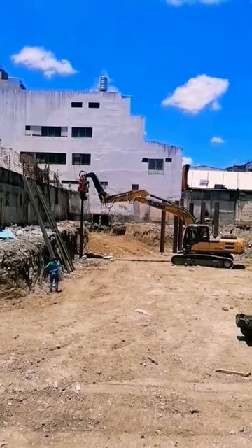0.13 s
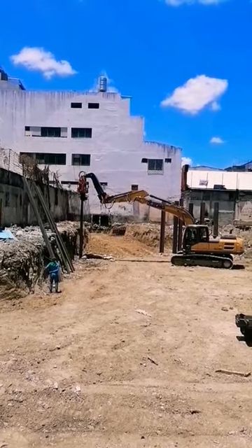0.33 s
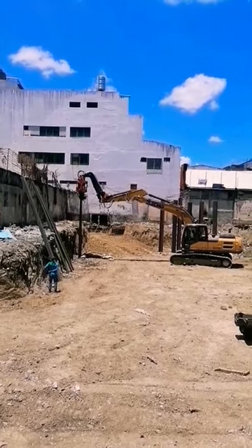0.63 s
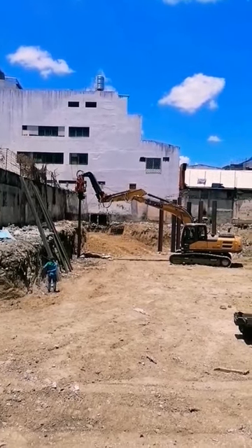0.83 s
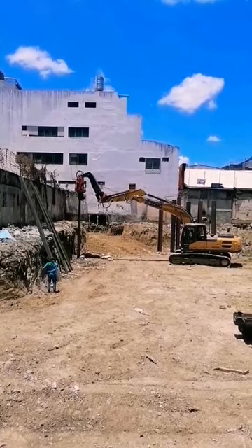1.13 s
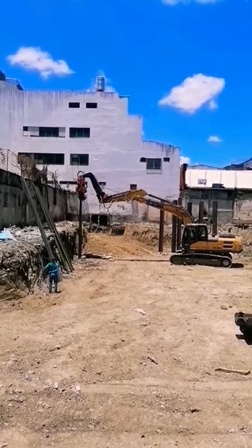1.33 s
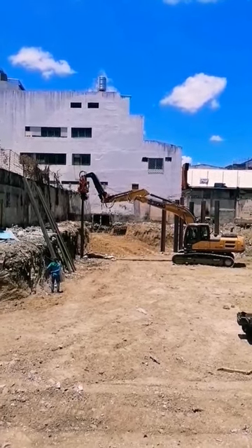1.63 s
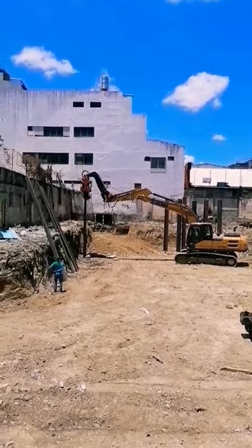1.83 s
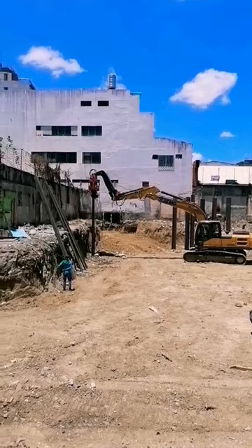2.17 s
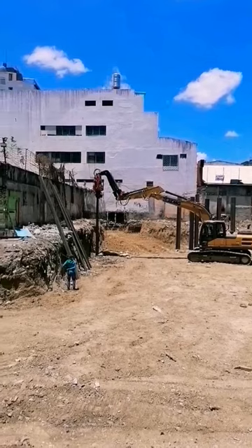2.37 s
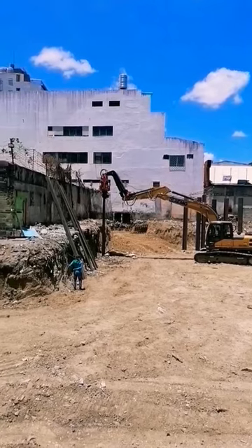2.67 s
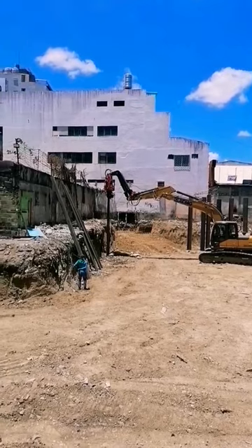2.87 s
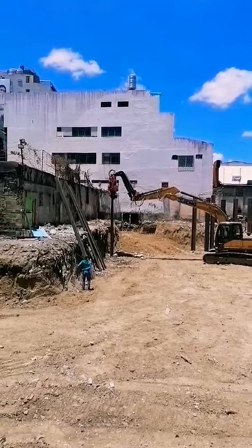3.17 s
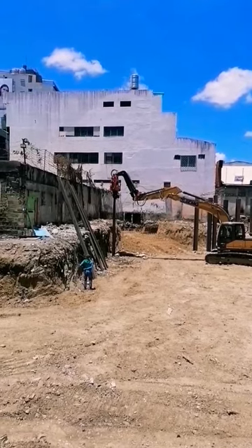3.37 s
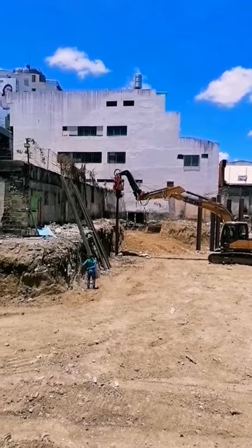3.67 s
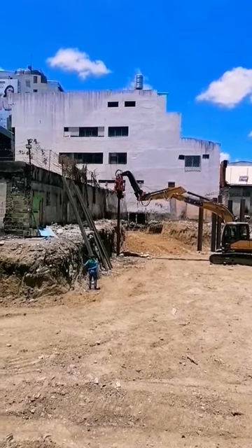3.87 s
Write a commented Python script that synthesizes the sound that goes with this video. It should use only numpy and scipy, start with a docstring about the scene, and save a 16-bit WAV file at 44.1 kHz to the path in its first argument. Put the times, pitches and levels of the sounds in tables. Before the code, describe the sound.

A vibratory pile driver on an excavator: diesel drone and pump whine run steadily, then clanks and a brief ground thrum lead into loud, uneven steel hammering, heard from across a reverberant walled pit.

```python
"""A pump whines over the drone of an excavator's diesel, at a nearly steady speed, in a walled pit.
The vibratory driver on its arm starts: the clamp clanks on a steel sheet pile, the ground thrums briefly,
then the pile hammers and rattles loudly. Drone and whine are harmonics of one engine phase; engine noise,
rattle and blows are shaped noise; squeaks and thrum are jittered sines. The walls smear every blow."""
import sys
import numpy as np
from scipy import signal
from scipy.fft import rfft, irfft, next_fast_len
from scipy.io import wavfile
from scipy.ndimage import map_coordinates

SR = 44100
rng = np.random.default_rng(int(sys.argv[2]) if len(sys.argv) > 2 else 0)


def int16_out(signal):
    """Quantize to a 16-bit WAV file."""
    q = np.round(np.clip(np.atleast_2d(signal).T, -1, 1) * 32767)
    wavfile.write(sys.argv[1], SR, q.astype(np.int16))


N = 176400


def amp(db):
    """Decibels to gain."""
    return 10 ** (np.asarray(db) / 20)


def unit(x):
    """Scale to rms 1."""
    return x / np.sqrt(np.mean(x ** 2) + 1e-20)


def along(points, hz):
    """Interpolate (f/Hz, value) points on a log frequency axis."""
    f, v = np.transpose(points)
    return np.interp(np.log(hz + 1), np.log(f + 1), v)


def curve(rows):
    """Interpolate (t/s, value) points, one value per sample."""
    return np.interp(np.arange(N) / SR, *np.transpose(rows))


def wobble(rate_hz):
    """Smooth random curve through rate_hz normal knots a second."""
    knots = rng.standard_normal(int(N * rate_hz / SR) + 4)
    return map_coordinates(knots, [np.arange(N) * rate_hz / SR])


def filtered(x, response):
    """Multiply the spectrum of x by a complex response of frequency."""
    m = next_fast_len(N + SR)
    return irfft(rfft(x, m) * response(np.fft.rfftfreq(m, 1 / SR)), m)[..., :N]


def colour(x, spectrum):
    """Causal minimum-phase filter of (f/Hz, level/dB) shape that keeps the power of white noise."""
    m = 2 * next_fast_len(N)
    gain = unit(amp(along(spectrum, np.fft.rfftfreq(m, 1 / SR))))
    cepstrum = irfft(np.log(gain + 1e-6))
    # fold the cepstrum onto positive time
    cepstrum[1:m // 2] *= 2
    cepstrum[m // 2 + 1:] = 0
    return irfft(rfft(x, m) * np.exp(rfft(cepstrum)))[..., :N]


def spread(pair, alike, side_db):
    """Two unrelated signals to left and right, with a likeness and a balance for each frequency."""
    def mid_side_gains(hz):
        turn = np.arccos(np.clip(along(alike, hz), -1, 1)) / 2
        return np.array([np.cos(turn), np.sin(turn)])

    mid, side = filtered(pair, mid_side_gains)
    left_right = np.array([mid + side, mid - side])
    return filtered(left_right, lambda hz: amp(np.outer([.5, -.5], along(side_db, hz))))


def grains(rough_db):
    """Two noises, joint rms 1, clumped into tiny contacts by one shared random level."""
    return unit(rng.standard_normal((2, N)) * amp(rough_db * wobble(900)))


def strike(start_s, attack_s, hold_s, t60_s):
    """Envelope of one contact: exponential rise, hold, exponential decay."""
    t = np.maximum(np.arange(N) / SR - start_s, 0)
    decay = np.exp(-np.log(1000) * np.maximum(t - hold_s, 0) / t60_s)
    return (1 - np.exp(-t / attack_s)) * decay


def sing(hz, waver_hz):
    """A rough tone, near rms 1, whose pitch jitters quickly."""
    phase = 2 * np.pi * np.cumsum(hz + waver_hz * wobble(220)) / SR
    return np.sqrt(2) * np.sin(phase) * amp(1.5 * wobble(70))


def resonance(f, centre, width):
    """Complex response of one damped mode, 1 at its centre."""
    return 1j * f * width / (centre * centre - f * f + 1j * f * width)


def resonate(x, table):
    """Ring (f/Hz, width/Hz, level/dB) modes, dark above the last, keeping the power of white noise."""
    def response(f):
        # alternate signs between successive modes
        modes = sum((-1) ** k * amp(db) * resonance(f, hz, width) for k, (hz, width, db) in enumerate(table))
        modes = modes / (1 + .5j * f / table[-1][0]) ** 2
        return modes / np.sqrt(np.mean(abs(modes) ** 2))

    return filtered(x, response)


# bending modes of the pile, relative to its broad response [f/Hz, level/dB]
BENDING = [(195, 6), (251, 4), (424, 2), (566, 4), (955, 4), (1064, 6), (1146, 6), (1482, 4)]
BENDING_WIDTH_HZ = 10


def bend(x):
    """Lift the pile's bending modes out of its broad response."""
    return filtered(x, lambda f: 1 + sum(
        (amp(db) - 1) * resonance(f, hz, BENDING_WIDTH_HZ) for hz, db in BENDING))


# reverberation time of the pit [f/Hz, t60/s]
WALLS = [(200, 0.72), (2000, 0.72), (10000, 0.48)]


def walls(x, wet_db):
    """Add the pit's reverberation: a noise tail, each frequency dying at its own speed."""
    hz, t, z = signal.stft(rng.standard_normal((2, SR // 2)), SR, nperseg=256)
    decay = np.exp(-np.log(1000) * t / along(WALLS, hz)[:, None])
    tail = signal.istft(z * decay, SR, nperseg=256)[1]
    tail = tail / np.linalg.norm(tail[0])
    return x + amp(wet_db) * signal.fftconvolve(x, tail, axes=1)[:, :N]


REPEAT_SHARE = .4  # of the power


def valve_train(phase, firing_hz):
    """Clatter noise of which a share repeats with every second firing."""
    pattern = rng.standard_normal((2, round(2 * SR / firing_hz)))
    place = (phase / (4 * np.pi) % 1 * pattern.shape[1]).astype(int)
    repeated = np.sqrt(REPEAT_SHARE) * pattern[:, place]
    return repeated + np.sqrt(1 - REPEAT_SHARE) * grains(rough_db=1.5)


# engine speed [t/s, firing rate/Hz]
SPEED = [(0, 64.6), (.4, 67), (.8, 66.4), (1.3, 67.05), (2.1, 67.15), (2.4, 65.6), (2.65, 66.2), (4, 66.2)]
# exhaust drone [t/s, level/dB]
DRONE = [(0, -36), (1.2, -38), (2.25, -43.5), (2.38, -34.5), (2.7, -38.5), (4, -38.5)]
# exhaust orders [multiple of firing rate, level/dB]
ORDERS = [(1, 0), (2, -13), (3, -7)]
# pump whine [t/s, level/dB]
WHINE = [(0, -50.5), (.4, -40.5), (.8, -41.5), (1.1, -38.5), (1.6, -38), (2.05, -40.5), (2.35, -50),
         (2.7, -42), (4, -33)]
# pump overtones [multiple of piston rate, level/dB]
PUMP = [(1, -2.5), (2, -22)]
PISTONS = 9  # piston rate / firing rate
# mechanical clatter [t/s, level/dB]
ENGINE_LEVEL = [(0, -42), (.3, -41), (1, -41.5), (1.6, -41), (2.1, -41.5), (4, -46)]
# clatter spectrum, relative [f/Hz, level/dB per Hz]
ENGINE_BODY = [(250, -40.5), (473, -11), (620, -10), (799, -19.5), (1260, -17.5), (1500, -23), (1630, -18),
               (1900, -25.5), (2240, -24.5), (3200, -30.5), (3950, -32.5), (4250, -37.5), (4960, -35),
               (5550, -36), (6300, -42), (9500, -46), (15000, -64)]
# low rumble spectrum, relative [f/Hz, level/dB per Hz]
RUMBLE = [(30, -11), (45, 2), (80, 0), (190, 1.5), (330, -8.5), (385, -4.5), (430, -11.5), (700, -13),
          (2000, -84)]
RUMBLE_DB = -37
# engine noise, stereo likeness [f/Hz, left-right correlation]
ENGINE_ALIKE = [(60, 0.77), (200, 1), (1000, 0.73), (5000, 0.24)]
# engine noise, stereo balance [f/Hz, left minus right/dB]
ENGINE_SIDE = [(200, -1), (370, 3), (690, -2.5), (2300, -1.5), (8000, -1)]


def engine():
    """Diesel drone, pump whine and clatter follow one engine phase, over a steady rumble."""
    phase = 2 * np.pi * np.cumsum(curve(SPEED)) / SR

    def line(order, waver):
        sway = 1 + waver * (wobble(12) + 1j * wobble(13))
        return np.sqrt(2) * np.real(sway * np.exp(1j * (order * phase + 2 * np.pi * rng.random())))

    drone = amp(curve(DRONE)) * sum(amp(db) * line(k, waver=0.15) for k, db in ORDERS)
    whine = amp(curve(WHINE)) * sum(amp(db) * line(PISTONS * round(k), waver=0.23) for k, db in PUMP)
    firing_pulse = 1 + 0.059 * np.cos(phase)
    clatter = valve_train(phase, SPEED[-1][1]) * firing_pulse
    clatter = colour(clatter, [(150, -20.5)] + list(ENGINE_BODY))
    clatter = amp(curve(ENGINE_LEVEL) + 0.76 * wobble(10.97)) * clatter
    rumble = amp(RUMBLE_DB) * colour(rng.standard_normal((2, N)), RUMBLE)
    rightward = np.array([[-1], [1]])
    tones = drone * amp(rightward * 1.6) + whine * amp(rightward * 3.2)
    return tones + spread(clatter + rumble, ENGINE_ALIKE, ENGINE_SIDE)


# thin machine squeaks [t/s, hold/s, f/Hz, level/dB]
SQUEAKS = [(.35, .1, 3980, -62), (.61, .07, 3990, -62), (2.98, .08, 4130, -45), (3.168, .012, 6080, -40),
           (3.31, .15, 4110, -44), (3.642, .014, 6060, -45)]


def squeaks():
    """Thin steel squeaks as jittered tones, faint at first and stronger once the pile shakes."""
    return sum(amp(db) * strike(s, .008, hold, .08) * sing(hz, 50) for s, hold, hz, db in SQUEAKS)


# resonances of frame, pile, ground [t/s, hold/s, f/Hz, waver/Hz, level/dB]
SPIN_UP = [(2.6, .4, 920, 32, -42), (2.835, .06, 620, 12, -28.5), (2.94, .1, 65.5, 3, -28.5)]


def spin_up():
    """As it spins up, the driver sets off one resonance after another, each a wavering tone."""
    return sum(amp(db) * strike(s, .02, hold, .08) * sing(hz, waver) for s, hold, hz, waver, db in SPIN_UP)


# first clanks of the clamp [t/s, level/dB]
CLANKS = [(2.597, -39.5), (2.766, -36), (2.802, -39), (2.848, -29), (2.928, -32), (2.97, -27),
          (2.995, -25.5), (3.034, -27.5)]
# dull knocks of the pile [t/s, level/dB]
KNOCKS = [(2.537, -28.5), (2.6, -31.5), (2.801, -28), (2.854, -25.5), (2.934, -26.5)]
# jaws rubbing on the pile [t/s, level/dB]
SQUEAL = [(2.585, -80), (2.61, -47), (2.755, -49), (2.78, -43), (2.96, -37), (3, -31), (3.08, -34),
          (4, -41)]
# steel modes of clamp and pile [f/Hz, width/Hz, level/dB]
STEEL = [(1530, 45, -3), (1875, 30, -11), (2245, 30, 4), (2305, 45, 0), (2697, 28, -1), (2810, 50, -7),
         (3275, 30, -11), (4095, 35, -13)]
CLANK_RING_DB, CRACK_DB, THUD_DB = -6, -1, -1


def clamp():
    """The jaws clank and rub on the pile and keep its steel singing; the pile answers with dull knocks."""
    # contacts add by power
    clanks = np.sqrt(sum((amp(db) * strike(s, 0.00073, 0.0064, 0.15)) ** 2 for s, db in CLANKS))
    force = clanks * grains(rough_db=-1.0)
    crack = colour(force, [(300, -29), (1200, 12.5), (2700, 9), (3200, 1), (7500, -11.5), (10000, -36)])
    knocks = np.sqrt(sum((amp(db) * strike(s, 0.0017, 0.0081, 0.13)) ** 2 for s, db in KNOCKS))
    thud = colour(knocks * grains(rough_db=-0.5),
                  [(150, -12.5), (500, 11), (1250, 6.5), (1600, -18), (8000, -46)])
    singing = [sum(amp(db) * sing(hz, width) for hz, width, db in STEEL) for channel in range(2)]
    squeal = amp(curve(SQUEAL)) * unit(np.array(singing))
    rings = amp(CLANK_RING_DB) * resonate(force, STEEL)
    return squeal + walls(rings + amp(CRACK_DB) * crack + amp(THUD_DB) * thud, wet_db=-5.5)


# gritty scrapes of steel on steel [t/s, level/dB]
SCRAPES = [(3.222, -32), (3.293, -32.5), (3.369, -32), (3.489, -33), (3.526, -32.5), (3.663, -26.5),
           (3.843, -28), (3.958, -34)]
# scrape spectrum, relative [f/Hz, level/dB per Hz]
GRIT = [(500, -51), (2500, -3), (8000, -2), (10000, -2), (12000, -17), (15000, -9)]


def scrapes():
    """The pile grinds along its neighbour in short bright bursts of grainy noise."""
    force = sum(amp(db) * strike(s, .006, .01, .07) for s, db in SCRAPES)
    return walls(colour(force * grains(rough_db=-3), GRIT), wet_db=-5.5)


# rattle of the pile [t/s, level/dB]
RATTLE = [(2.5, -66), (2.75, -43), (2.9, -40), (3.1, -26), (3.3, -22.5), (4, -23)]
# broad response of the pile, relative [f/Hz, level/dB per Hz]
PILE = [(30, -36), (140, -10.5), (180, -5), (260, -4.5), (350, -10), (430, -5.5), (600, -4.5), (720, -12),
        (1150, -10), (1500, -12), (2030, -17.5), (2800, -16), (3050, -20.5), (3900, -25), (4700, -31),
        (9000, -33.5), (15000, -53)]
SHAKE_HZ = 44.26  # typical contact rate
LIFT_S, LIFT_DB = 0.0093, -1.5  # slackening: lead and width, depth before the strongest blow
BRIGHTEN = 0.16  # treble dB per rattle dB
STEEL_DB = -17.5


def pile():
    """A fast uneven rattle through the body of the sheet pile, brighter as it grows."""
    cycle = np.cumsum(SHAKE_HZ * np.exp(.2 * wobble(30))) / SR
    contacts = unit(np.exp(-(cycle % 1) / 1.15) * amp(wobble(40)))
    # the rattle slackens just before each heavy blow
    t = np.arange(N) / SR
    top_db = max(row[1] for row in BLOWS)
    lift = sum(np.exp(-((t - s + LIFT_S) / LIFT_S) ** 2) * amp(db - top_db) ** .5 for s, db, hold, hz in BLOWS)
    effort_db = curve(RATTLE)
    force = amp(effort_db + LIFT_DB * lift) * contacts * grains(rough_db=2)
    rattle = colour(force, PILE)
    treble = filtered(rattle, lambda hz: 1 - 1 / (1 + (hz / 4200) ** 4))
    rattle = rattle + treble * (amp(BRIGHTEN * (effort_db - effort_db.max())) - 1)
    return walls(bend(rattle) + amp(STEEL_DB) * resonate(force, STEEL), wet_db=-3)


# heavy blows of the pile [t/s, level/dB, hold/s, clang centre f/Hz]
BLOWS = [(3.077, -19.5, 0.018, 515), (3.143, -14.5, 0.028, 560), (3.219, -15, 0.031, 463),
         (3.29, -17, 0.017, 880), (3.318, -19, .012, 398), (3.365, -18.5, 0.014, 720),
         (3.427, -24, 0.011, 500), (3.477, -19, 0.0067, 520), (3.524, -21.5, 0.031, 1470),
         (3.539, -21.5, 0.017, 200), (3.6, -22.5, 0.037, 230), (3.66, -21.5, 0.0074, 1110),
         (3.68, -22, 0.0073, 482), (3.771, -20.5, 0.011, 800), (3.831, -18, 0.017, 1190),
         (3.932, -23, 0.04, 700)]
BLOW_T60_S, BLOW_OCTAVES = 0.086, 0.82  # decay; half bandwidth
CONTACT_DB = 15.5  # contact click above the blow level


def blows():
    """The pile slams against its neighbour: a hard contact, then a clang centred by where it hits."""
    body = bend(colour(rng.standard_normal((2, N)), PILE))
    clangs, contacts = np.zeros((2, N)), np.zeros((2, N))
    for s, db, hold, hz in BLOWS:
        edges_hz = hz * 2.0 ** (BLOW_OCTAVES * np.array([-1, 1]))
        band = signal.butter(1, edges_hz, "band", fs=SR)
        clangs += amp(db) * strike(s, 0.0011, hold, BLOW_T60_S) * unit(signal.lfilter(*band, body))
        contacts[0, round(s * SR)] += amp(db + CONTACT_DB)
    return walls(clangs + colour(contacts, PILE), wet_db=-7.5)


# driver and pile, stereo likeness [f/Hz, left-right correlation]
PILE_ALIKE = [(150, 1), (550, 0.89), (1000, 0.52), (2000, 0.19), (8000, -0.13)]
# driver and pile, stereo balance [f/Hz, left minus right/dB]
PILE_SIDE = [(110, -2), (370, 1.8), (1200, -3.5), (2200, -.5), (4300, -3), (8000, -0.5)]


def scene():
    """The engine leans right; the driver and its pile are near the middle."""
    driven_pile = spread(clamp() + pile() + blows() + scrapes(), PILE_ALIKE, PILE_SIDE)
    return engine() + squeaks() + spin_up() + driven_pile


TOP_HZ = 15200


def record(dry):
    """Nothing is kept above the band limit."""
    return filtered(dry, lambda hz: hz < TOP_HZ)


dry = scene()
out = record(dry)
int16_out(out)
```